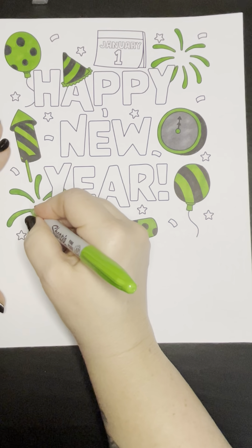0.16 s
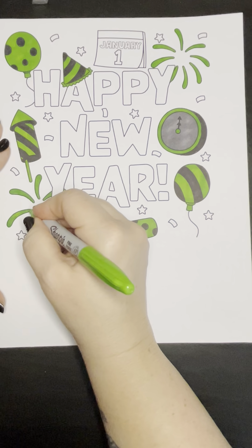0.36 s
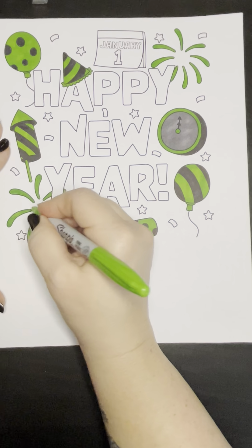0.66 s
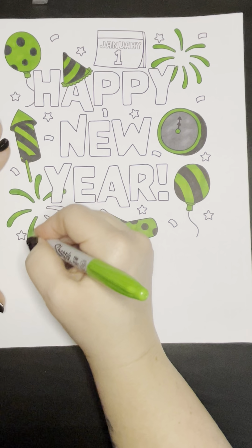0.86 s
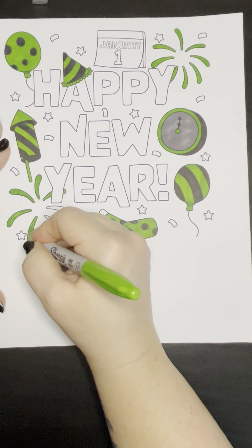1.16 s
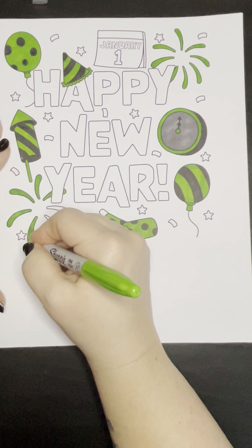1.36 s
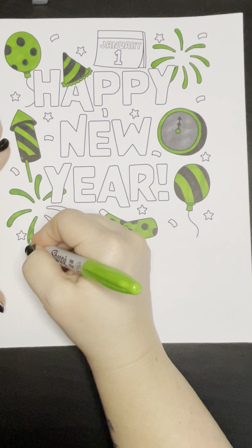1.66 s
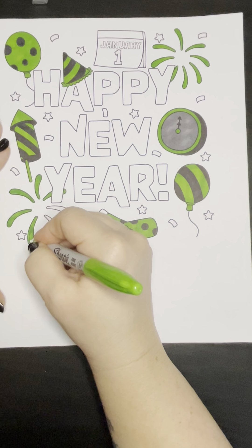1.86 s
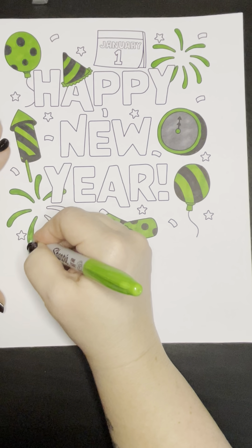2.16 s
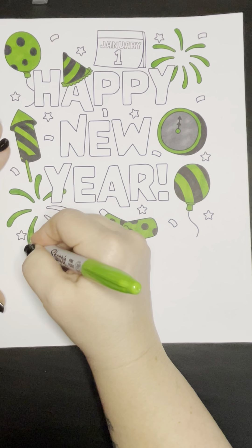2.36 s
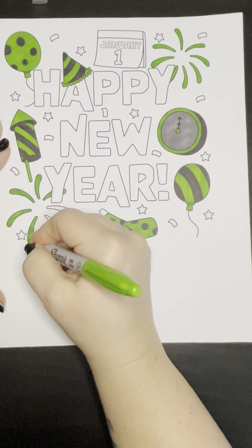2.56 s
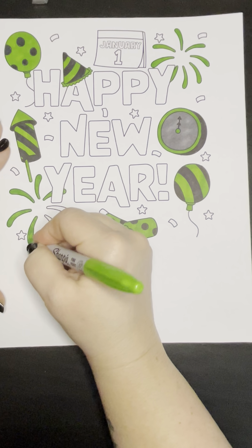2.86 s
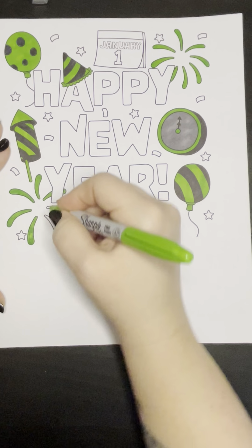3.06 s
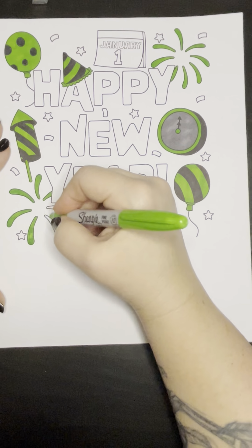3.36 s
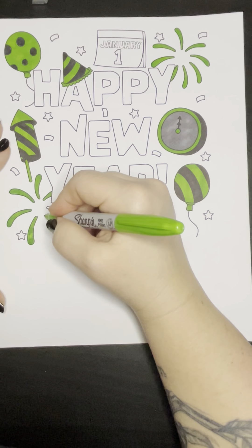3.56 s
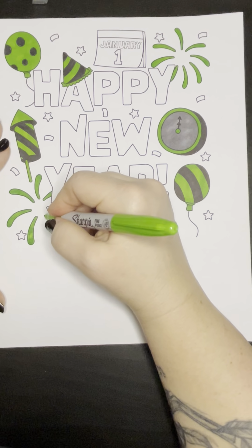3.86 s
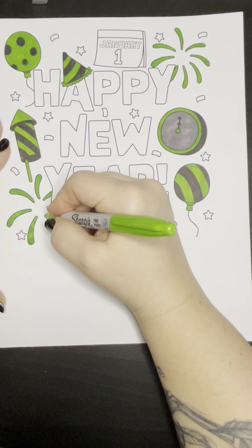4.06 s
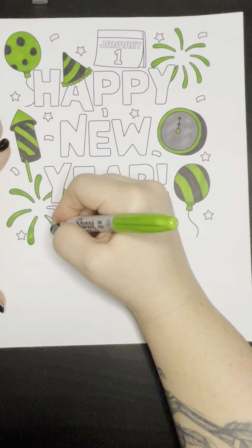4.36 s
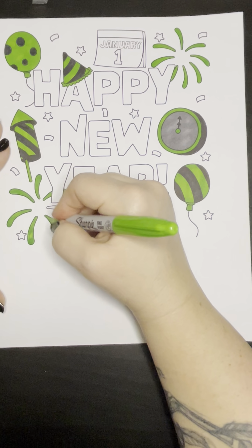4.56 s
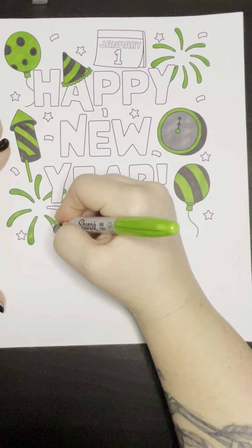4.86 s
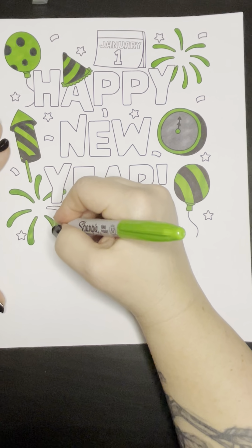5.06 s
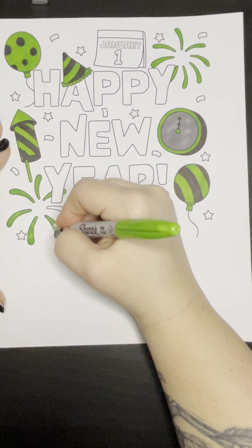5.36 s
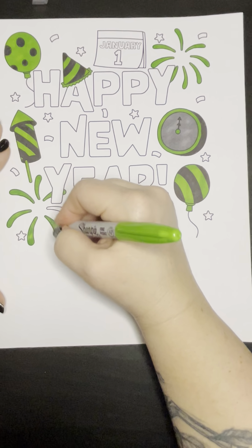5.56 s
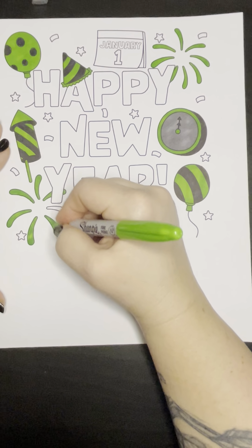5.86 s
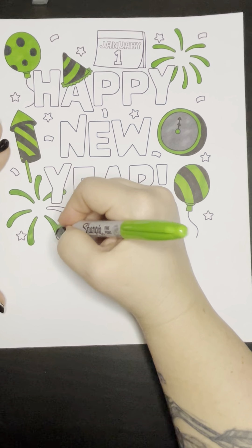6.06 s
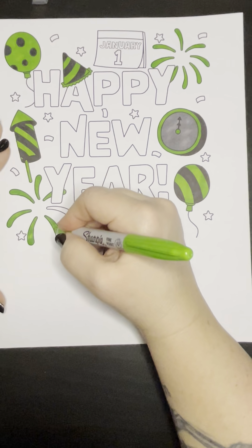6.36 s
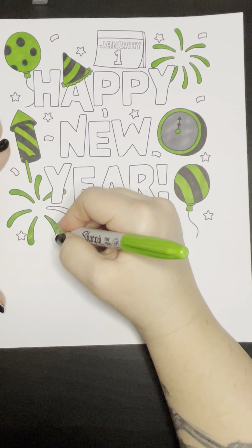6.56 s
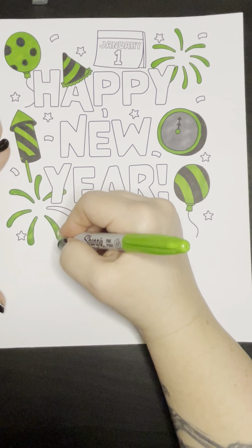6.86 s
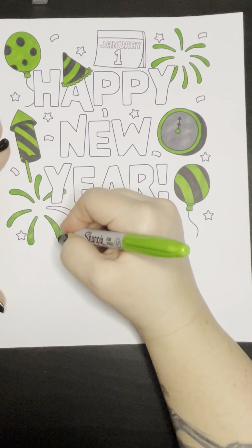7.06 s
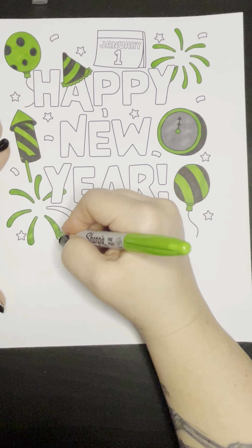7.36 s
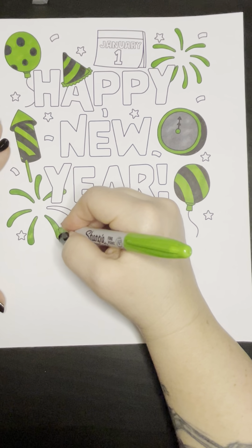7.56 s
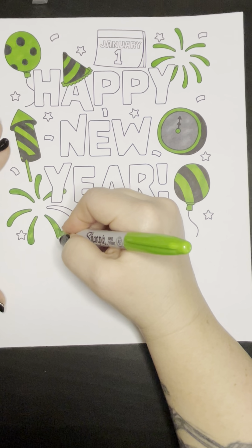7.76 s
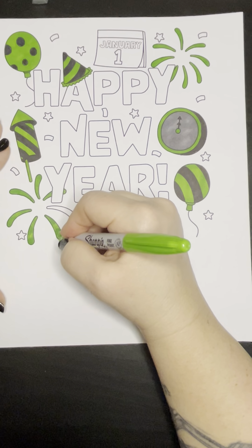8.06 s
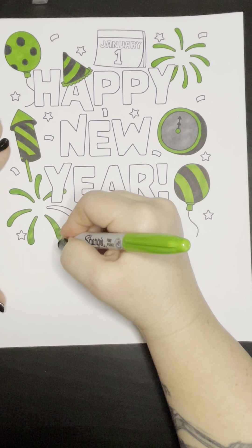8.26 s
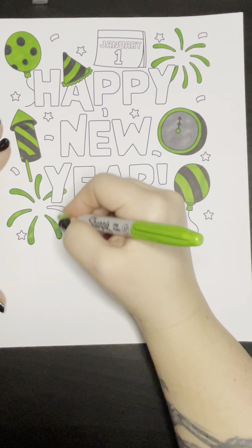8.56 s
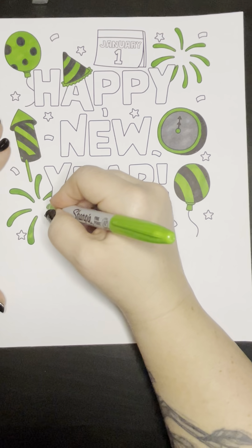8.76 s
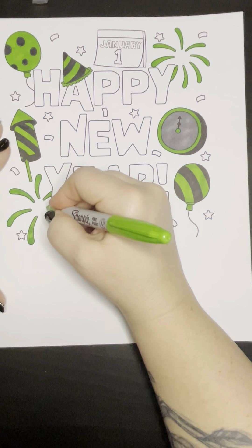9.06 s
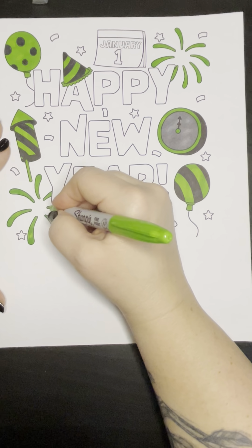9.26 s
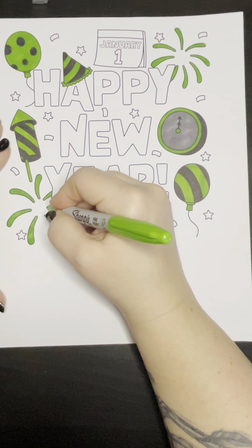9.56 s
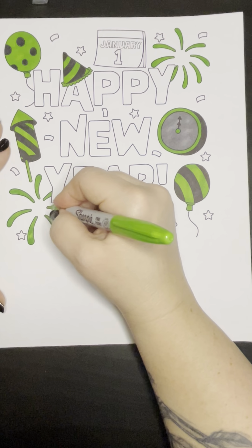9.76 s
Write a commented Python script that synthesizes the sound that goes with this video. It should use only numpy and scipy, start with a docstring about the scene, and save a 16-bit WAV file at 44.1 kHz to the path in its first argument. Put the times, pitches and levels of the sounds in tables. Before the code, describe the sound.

An appliance hums low and steady throughout in a small, quiet room, with the microphone close to a sheet of paper on a desk. In the first second a hand slides softly over the sheet. At about 1.2 seconds a felt-tip marker starts colouring faintly, with a dry tick of the nib near 1.9 seconds and a quick run of scratchy strokes from 2.5 to 3 seconds. The hand then slides to a new place and the desk thrums faintly under the arm. The loudest back-and-forth scribbling comes in three runs, at roughly 4 to 5, 5.3 to 6 and 6.5 to 7.4 seconds, with a few small ticks in the first two and soft brushing of skin between them. Two lighter runs follow, from about 7.6 to 8.5 seconds and from 9.2 to 10 seconds, separated by another soft hand slide.

```python
"""A desk in a small, quiet room, a two-port microphone close to a sheet of paper; an appliance hums throughout.
First a hand slides over the sheet. After a second a felt-tip marker starts colouring, faintly at first:
its nib plucks paper fibres, which ring the barrel and the sheet. Runs of quick back-and-forth strokes
follow, loudest from about 4 to 7 s; between runs the hand slides to a new place and the desk thrums
under the arm. The last two runs are lighter."""
import sys
import numpy as np
from scipy import signal
from scipy.fft import rfft, irfft, next_fast_len
from scipy.io import wavfile
from scipy.ndimage import map_coordinates

SR = 44100
rng = np.random.default_rng(int(sys.argv[2]) if len(sys.argv) > 2 else 0)


def store_wav(level_fs):
    """Save 16-bit WAV to argv[1]."""
    pcm = np.round(np.clip(np.atleast_2d(level_fs), -1, 1) * 32767)
    wavfile.write(sys.argv[1], SR, pcm.T.astype(np.int16))


N = 437472
PUSH, PULL = 0.33, 0.6  # place of top speed in a stroke (0-1): a push bites at once, a pull eases in


def nib():
    """Each stroke speeds up and slows to the turn; a slow nib crackles, a fast one blurs into hiss."""
    # nib strokes: start/s, end/s, level/dB, PUSH or PULL
    strokes = [(1.192, 1.247, -68, PUSH), (1.292, 1.405, -72.5, PULL), (1.428, 1.5, -69.5, PULL),
               (1.518, 1.67, -70, PUSH), (1.654, 1.9, -73.5, PULL), (1.858, 2.041, -55, PUSH),
               (2.049, 2.251, -58.5, PULL), (2.46, 2.534, -52, PUSH), (2.552, 2.621, -52, PUSH),
               (2.63, 2.703, -51, PUSH), (2.71, 2.768, -48.5, PUSH), (2.778, 2.841, -50.5, PUSH),
               (2.848, 2.884, -48.5, PUSH), (4.143, 4.329, -53.5, PULL), (4.377, 4.486, -47.5, PUSH),
               (4.522, 4.625, -49, PULL), (4.66, 4.749, -44.5, PUSH), (4.776, 4.876, -47, PUSH),
               (4.903, 4.965, -46, PUSH), (5.264, 5.426, -52, PULL), (5.435, 5.525, -43.5, PULL),
               (5.543, 5.633, -43, PUSH), (5.653, 5.724, -40, PUSH), (5.738, 5.826, -44.5, PUSH),
               (5.847, 5.912, -42, PUSH), (5.924, 6.026, -45.5, PUSH), (6.552, 6.685, -55.5, PULL),
               (6.699, 6.768, -47, PULL), (6.787, 6.873, -47, PUSH), (6.875, 6.954, -46, PULL),
               (6.966, 7.042, -43, PUSH), (7.043, 7.107, -40, PULL), (7.128, 7.193, -41.5, PUSH),
               (7.203, 7.265, -40, PULL), (7.286, 7.354, -43.4, PUSH), (7.62, 7.739, -61, PULL),
               (7.737, 7.9, -69.5, PUSH), (7.904, 7.98, -64, PULL), (8.024, 8.125, -62, PUSH),
               (8.14, 8.21, -63.5, PUSH), (8.255, 8.376, -66, PUSH), (8.402, 8.447, -55.5, PUSH),
               (9.211, 9.356, -54.5, PULL), (9.383, 9.64, -57.5, PUSH), (9.609, 9.69, -69, PULL),
               (9.691, 9.837, -55, PULL), (9.858, 9.998, -59, PULL)]
    # pressing harder brightens: dB of body lost and of sizzle gained per dB above a normal stroke
    normal_db, body_loss, sizzle_gain = -50, 0.35, 0.31
    out = np.zeros(N + SR)
    pressure = amp(0.32 * wobble(110) + 0.24 * wobble(30))  # the tooth of the paper shakes the nib
    for start, end, db, top in strokes:
        n = max(round((end - start) * SR), 64)
        speed = arch(np.linspace(0, 1, n), top)
        landing = 1 - np.exp(-np.arange(n) / SR / 0.0014)  # the felt gives as it meets the sheet
        modes, body_db, sizzle_db = grip_at(start)
        shift = 1 + 0.0092 * rng.standard_normal()  # the nib lands at a slightly new angle
        force_db = db - normal_db
        tilt = [(2000, body_db - body_loss * force_db), (4500, 0), (7500, 0),
                (11500, sizzle_db + sizzle_gain * force_db)]  # f/Hz, gain/dB
        snap_rate = 400 + 2000 * amp(db + 55) ** 2 * speed
        friction = fibres(snap_rate, spread_db=2, share=.45)
        colour = lambda hz: resonances(modes, hz * shift) * amp(along(tilt, hz)) * reflections(hz)
        scratch = unit(filtered(friction, colour))
        out[round(start * SR):][:n] += amp(db) * landing * speed ** 1.35 * scratch
    return out[:N] * pressure


def fibres(rate, spread_db, share):
    """Fibres snap free at a rate per second, in uneven sizes; share is their power against a smooth rub."""
    n = len(rate)
    freed = rng.random(n) < rate / SR
    snaps = freed * rng.standard_normal(n) * amp(spread_db * rng.standard_normal(n))
    return np.sqrt(share) * unit(snaps) + np.sqrt(1 - share) * rng.standard_normal(n)


def grip_at(time):
    """The hold on the marker sets how nib, barrel and sheet ring: resonances, body dB and sizzle dB."""
    # resonances of four holds: f/Hz, width/Hz, level/dB
    slanted = [(754, 980, -9.5), (2040, 890, -3.5), (2800, 200, -7), (3580, 770, -10), (4640, 700, -9),
               (5470, 940, -7), (6910, 480, -2), (8420, 1100, -4), (9240, 660.0, -17), (9860, 900, 3.5),
               (11250, 280.0, -8)]
    level = [(700, 630, -16), (1460, 350, -12), (1990, 440, -7.5), (2710, 520, -11.5), (3620, 500, -7.5),
             (4730, 1300, -4.5), (5650, 840, 3), (7150, 780, -3), (8450, 1250, -2.5), (9980, 1100, -1),
             (11130, 520, 0), (12500, 1000, -17)]
    curled = [(710, 430, -18), (1500.0, 420, -16), (2030, 490, -12.5), (2670, 560, -15), (3570, 760, -10),
              (4390, 740, -8.5), (5400, 1160, -3.5), (7100, 1200, -11), (8880, 1100, -3.5),
              (10030, 780, 2.5), (10560, 520, 5.5), (11900, 390, -18)]
    upright = [(740, 370, -5.5), (1430, 530, -5), (1880, 1040, -8.5), (3650, 540, -6.5), (4820, 1100, -9.5),
               (5900, 830, -3.5), (7270, 610, -6.5), (8320, 650, -6), (10000, 330, 0.5), (10860, 830, -9.5)]
    # the hold in each run: from/s, resonances, body/dB, sizzle/dB
    grips = [(0, slanted, -3.5, 2.5), (4, level, 8, -1), (5.15, level, 6, -1.3),
             (6.3, curled, 5.5, -3.5), (7.5, curled, 3, -1.5), (9, upright, -4, 4.5)]
    return [grip for since, *grip in grips if since <= time][-1]


def reflections(hz):
    """Three close reflections off the moving hand and the desk comb the spectrum."""
    delays_s = rng.uniform(0.000421, .003, (3, 1))
    return abs(1 + .17 * np.exp(-2j * np.pi * hz * delays_s).sum(0))


def ticks():
    """The nib touches down or snags on the paper with a short, dry tick."""
    # contacts: t/s, level/dB
    contacts = [(.6144, -58), (1.131, -61), (1.8878, -34.5), (2.4693, -45), (2.9574, -57), (4.383, -37),
                (4.6643, -42), (5.446, -34), (5.66, -40), (5.8478, -34), (5.8714, -42), (7.9538, -57),
                (8.1577, -55), (8.1846, -57), (9.4164, -47), (9.661, -51.5)]
    out, t = np.zeros(N + SR), np.arange(SR // 20) / SR
    t60_s = .028
    for start, db in contacts:
        modes = grip_at(start)[0]
        burst = filtered(rng.standard_normal(len(t)), lambda hz: resonances(modes, hz))
        out[round(start * SR):][:len(t)] += amp(db - 7 - 60 * t / t60_s) * unit(burst)
    return out[:N]


def hand():
    """Skin slides on paper with a soft hiss, and the heel of the hand rubs the desk with a duller note."""
    # the side of the hand slides, the heel drags: start/s, end/s, level/dB
    slides = [(-0.08, 0.1, -65), (0.715, 0.945, -67), (1.66, 1.97, -70), (2.255, 2.45, -66),
              (2.925, 2.99, -68.5), (2.95, 3.3, -65.5), (3.19, 3.37, -64.5), (3.28, 3.58, -80),
              (5.0, 5.125, -70), (5.08, 5.26, -85), (6.115, 6.345, -59.5), (6.3, 6.66, -80.5),
              (8.49, 8.79, -65.5)]
    drags = [(1.4, 2.2, -68.5), (2.24, 2.47, -59.5), (2.45, 3.5, -64.5), (4.1, 5.1, -67.5),
             (7.5, 8.2, -70.5), (9.15, 9.9, -80)]
    # spectrum of skin on paper: f/Hz, level/dB
    skin = [(200, -16), (750, -6.5), (1300, -9), (2250, -5.5), (3100, -9.5), (3900, -5.5), (4800, -8.5),
            (5500, -7.5), (7500, -6.5), (9000, 2.5), (9500, -0.5), (10600, 0), (11800, -13.5), (12900, -51)]
    heel = [(740, 410, 7.0), (1600, 1400, -6.0), (2220, 1800, -11)]  # f/Hz, width/Hz, level/dB
    friction = fibres(np.full(N, 8000.), spread_db=5.5, share=0.23)
    hiss = unit(filtered(friction, lambda hz: amp(along(skin, hz))))
    hiss *= moves(slides, top=0.49, power=2.24)
    rub = resonant_noise(heel) * moves(drags, top=0.56, power=1.9)
    cling = amp(0.8 * wobble(35))
    return cling * (hiss * amp(5.5) + rub * amp(-4.5))


def desk():
    """The desk top thrums at its lowest resonance, more as the arm shifts its weight on it."""
    # shifts of the arm: start/s, end/s, level/dB
    arm_shifts = [(2.1, 3.4, -50.5), (3.2, 3.48, -45), (5.1, 6.6, -50), (7.3, 7.95, -48), (8.35, 8.8, -52),
                  (9.05, 9.6, -50.5)]
    resting_arm = amp(-66)
    load = resting_arm + moves(arm_shifts, top=.52, power=2.2)
    return resonant_noise([(74, 28.5, 0)]) * load * amp(-3.5)


def room(x):
    """The near walls answer briefly, each frequency with its own decay and stereo width."""
    # reverberation time: f/Hz, t60/s
    decay = [(200, 0.3), (2000, 0.33), (10000, 0.18)]
    # width of the echo: f/Hz, side over mid/dB
    width = [(1000, 2), (1900, -17), (3000, 9.5), (4700, -14), (6000, -15), (7500, 5), (9200, -23),
             (11300, -5), (12300, -14)]
    hz, t, noise = signal.stft(rng.standard_normal((2, SR // 2)), SR, nperseg=256)
    fade = amp(-60 * t / along(decay, hz)[:, None])
    mid, side = signal.istft(noise * fade, SR, nperseg=256)[1]
    tail = mid + filtered(side, lambda f: amp(along(width, f))) * np.array([[1], [-1]])
    delayed = np.pad(x, (200, 0))[None]
    return signal.fftconvolve(delayed, tail / np.linalg.norm(tail[0]), axes=1)[:, :N]


def hum():
    """The appliance's motor and fan lines, each wavering slightly in phase and strength."""
    # lines: f/Hz, level/dB, left over right/dB
    lines = [(37.7, -67, 0), (75.4, -57.5, -.6), (113.1, -59.5, -1), (122, -63, -1), (150.8, -63.5, -1.5),
             (177.7, -62.5, -1.5), (237, -71.5, -2), (274.5, -68.5, -2.5), (339, -76, -3),
             (360.4, -58.5, -4.5), (1302, -83.5, 0)]
    t, out = np.arange(N) / SR, np.zeros((2, N))
    for hz, db, pan_db in lines:
        phase = 2 * np.pi * (hz * t + rng.random()) + 0.66 * wobble(2.5)
        strength = amp(db - 0.75 + 1.96 * wobble(7) + 0.71 * wobble(2.524))
        out += strength * np.sqrt(2) * np.sin(phase) * amp([[pan_db / 2], [-pan_db / 2]])
    return out


def room_tone():
    """The appliance's steady rumble, a touch to the right, and a faint hiss of air."""
    # spectra: f/Hz, level/dB
    rumble = [(24, -48), (36, -27), (48, -2), (60, 3), (72, -1.5), (84, -4.5), (102, -10), (122, -1),
              (140, -7.5), (200, -13), (300, -10), (380, -21.5), (450, -23), (700, -60)]
    air = [(200, 0), (600, 1), (780, -2), (1050, -8), (2100, -12), (3100, -19.5), (4200, -27.5),
           (5600, -29.5), (8000, -27.5), (10800, -25), (12200, -51), (13500, -54)]
    return amp(-52.5) * diffuse(rumble) * amp([[-.4], [.4]]) + amp(-63.5) * diffuse(air)


def diffuse(spectrum):
    """Room noise of rms 1 at the two ports, alike in the bass and in some higher bands."""
    # likeness of left and right: f/Hz, correlation
    likeness = [(60, .999), (130, 0.97), (270, 0.92), (590, 0.067), (1260, 0.16), (1900, 1), (2690, 0.21),
                (5000, 0.73), (9000, 0.99)]

    def mid_and_side(hz):
        angle = np.arccos(along(likeness, hz)) / 2
        return amp(along(spectrum, hz)) * [np.cos(angle), np.sin(angle)]

    mid, side = filtered(rng.standard_normal((2, N)), mid_and_side)
    return unit(np.array([mid + side, mid - side]))


def arch(u, top):
    """Speed of one movement over its course u (0-1): up from rest to 1 at top, and back to rest."""
    u = np.clip(u, 0, 1)
    return (u / top) ** top * ((1 - u) / (1 - top)) ** (1 - top)


def moves(rows, top, power):
    """Gain per sample of movements (start/s, end/s, level/dB); each follows a power of its speed."""
    t = np.arange(N) / SR
    gains = (amp(db) * arch((t - start) / (end - start), top) ** power for start, end, db in rows)
    return np.sqrt(sum(gain ** 2 for gain in gains))


def resonances(modes, hz):
    """Gain of a set of broad, steep-sided resonances (f/Hz, width/Hz, level/dB)."""
    power = 0
    for centre, width, db in modes:
        detuning = (hz ** 2 - centre ** 2) / ((hz + 1) * width)
        power += amp(db) ** 2 / (1 + detuning ** 2) ** 2
    return np.sqrt(power)


def resonant_noise(modes):
    """Noise through a set of resonances, at rms 1."""
    return unit(filtered(rng.standard_normal(N), lambda hz: resonances(modes, hz)))


def filtered(x, response):
    """x shaped by a response, a function of frequency."""
    n = x.shape[-1]
    size = next_fast_len(n + 8192)
    return irfft(rfft(x, size) * response(np.fft.rfftfreq(size, 1 / SR)), size)[..., :n]


def wobble(rate):
    """A smooth random curve, rate knots a second."""
    knots = rng.standard_normal(int(N * rate / SR) + 4)
    return map_coordinates(knots, [np.arange(N) * rate / SR])


def along(points, hz):
    """Interpolate points (f/Hz, value) on a log frequency axis."""
    freqs, values = np.transpose(points)
    return np.interp(np.log(hz + 1), np.log(freqs + 1), values)


def amp(db):
    """Decibels to gain."""
    return 10 ** (np.asarray(db) / 20)


def unit(x):
    """Scale to rms 1."""
    return x / np.sqrt(np.mean(x ** 2) + 1e-20)


def scene():
    """The sheet close up with a little echo, over the desk, the hum and the room tone."""
    sheet = nib() + ticks() + hand()
    return sheet + amp(-14.0) * room(sheet) + desk() + hum() + room_tone()


def record(dry):
    """The microphone's two ports fall out of step towards the treble; the top of the band is cut steeply."""
    # the ports compared: f/Hz, lead of left/rad, left over right/dB
    ports = [(0, 0, 0), (260, -.08, 0), (700, .5, 0), (1200, .2, -1.5), (1600, .03, 0), (2500, .25, 0),
             (2850, .7, -2), (3250, .8, 2), (3950, .65, 0), (4500, 1.3, -.5), (4750, 2.4, -7),
             (4900, 3.7, -3), (5250, 5, -1), (5550, 5.8, 2), (5800, 6.25, 0), (8500, 9, 0), (9560, 9.7, 0),
             (11500, 11.7, 0), (12000, 12.5, 0)]
    freqs, lead, pan_db = np.transpose(ports)
    sides = np.array([[1], [-1]]) / 2
    top_hz = 12800

    def response(hz):
        phase = np.interp(hz, freqs, lead) * sides
        balance = amp(np.interp(hz, freqs, pan_db) * sides)
        return np.exp(1j * phase) * balance / np.sqrt(1 + (hz / top_hz) ** 160)

    return filtered(dry, response)


dry = scene()
out = record(dry)
store_wav(out)
```